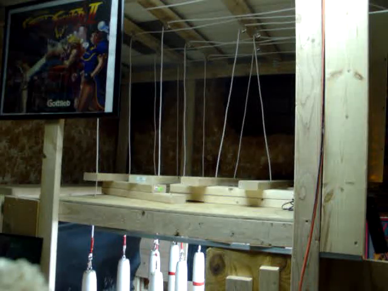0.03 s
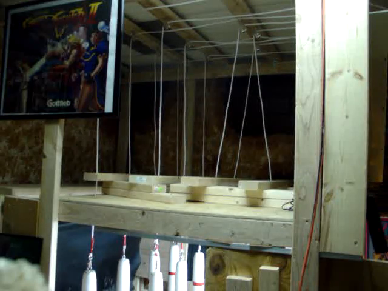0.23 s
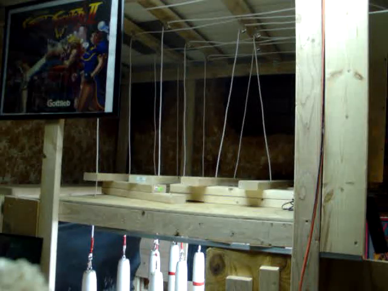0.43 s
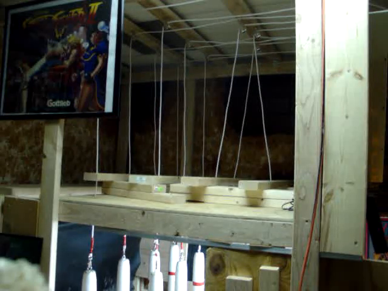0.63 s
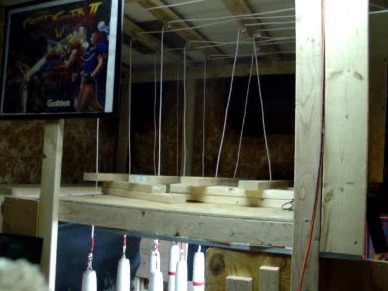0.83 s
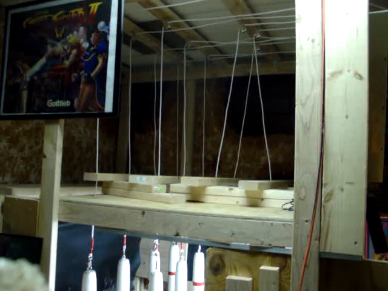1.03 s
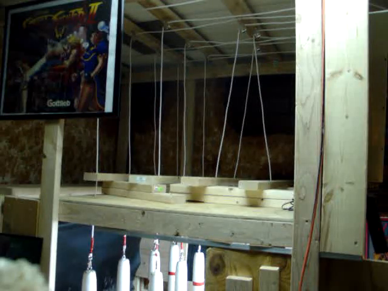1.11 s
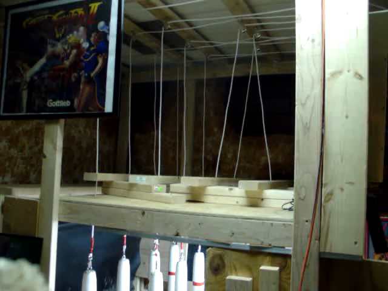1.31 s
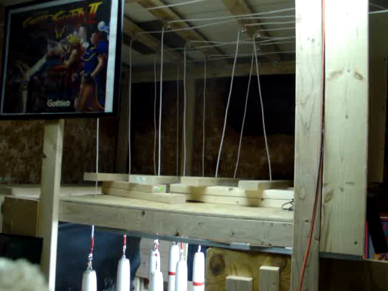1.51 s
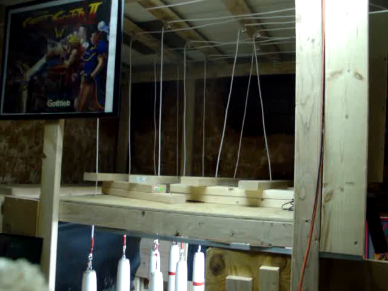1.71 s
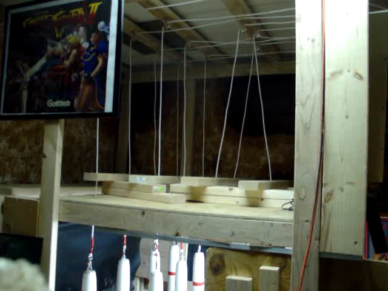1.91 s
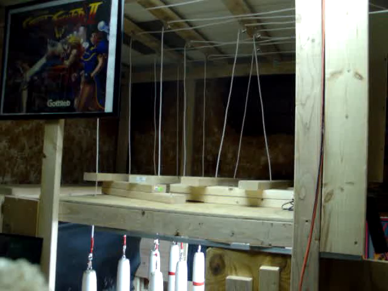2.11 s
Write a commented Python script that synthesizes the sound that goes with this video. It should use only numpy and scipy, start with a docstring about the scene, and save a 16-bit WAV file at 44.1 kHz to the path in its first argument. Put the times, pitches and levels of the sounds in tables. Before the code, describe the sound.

Hanging wooden pins knock and clatter irregularly against each other and a timber frame.

```python
"""Wooden pins on cords knock against each other and their timber frame in a small basement.
Each knock makes a pin ring and the room echo; two loud clatters stand among lighter taps.
The frame's boards give hollow thuds when bumped, and the frame rumbles softly over a faint hiss.
A cord rasps as it rubs over wood, then slips with one short squeak."""
import sys
import numpy as np
from scipy import signal
from scipy.fft import rfft, irfft, next_fast_len
from scipy.io import wavfile

SR = 44100
rng = np.random.default_rng(int(sys.argv[2]) if len(sys.argv) > 2 else 0)


def wrap_up_sound(samples):
    """Save the sound to the file named by the first command line argument, as 16-bit audio."""
    columns = np.atleast_2d(samples).T
    # keep every value between -1 and 1, then stretch to whole-number steps
    tamed = np.clip(columns, -1, 1)
    steps = np.round(tamed * 32767).astype(np.int16)
    wavfile.write(sys.argv[1], SR, steps)


N = 94815

# How loud the frame rumbles. Each row: time in seconds, level in dB.
RUMBLE_LEVELS = [(0, -37), (.13, -32), (.42, -34), (.62, -27.5), (0.771, -41.5), (.95, -31), (1.25, -29.5),
                 (1.45, -33.5), (1.749, -27.5), (1.951, -36.5), (2.15, -34)]
# The rumble's tone, from low to high. Each row: frequency in Hz, level in dB.
RUMBLE_TONE = [(20, -50), (40, -37), (58, -10), (85, -9), (130, -4.5), (170, -7), (220, 0), (420, -3),
               (600, -13.5), (1000, -19), (2000, -30), (5000, -45.5)]
# Pitches the frame favours. Each row: frequency in Hz, width in Hz, boost in dB.
FRAME_PEAKS = [(137.6, 27, 10), (208.5, 15, 8.8), (354, 8.2, 10.7), (414, 90, 3.1), (496, 23, 8.4),
               (587, 39, 3.1)]
# The hiss's tone. Each row: frequency in Hz, level in dB.
HISS_TONE = [(100, -2), (1500, -3), (3000, -10), (6000, -14.5), (9000, -15), (10000, -30.5)]
# Bumps on the boards. Each row: start in seconds, pitch in Hz, level in dB, fade time in seconds.
# A fade time is how long a sound takes to drop by 60 dB.
BOARD_THUDS = [(.064, 414, -26.5, 0.15), (.240, 146.5, -25.5, 0.3), (.250, 201.4, -20, 0.24),
               (.400, 199, -23.5, 0.2), (0.481, 361, -10.5, 0.033), (0.498, 357, -5.5, 0.032),
               (0.551, 229, -26.5, 0.11), (.626, 207, -19.5, .14), (.645, 60.5, -34.5, 0.43),
               (.803, 272, -13, 0.19), (0.807, 32.6, -33.5, 0.32), (.815, 339.1, -15.5, 0.29),
               (.848, 249, -9.5, 0.14), (1.170, 140.3, -33.5, 1), (1.172, 268, -23.5, 0.24),
               (1.180, 407, -22, 0.25), (1.372, 370.5, -20, 0.42), (1.575, 568, -17.5, 0.56),
               (1.590, 385, -17, 0.62), (1.600, 127.2, -22, 0.2), (1.620, 497.4, -22, 0.7),
               (1.660, 51, -35, 0.3), (1.695, 194, -14.5, 0.28), (1.740, 186, -20, 0.12)]
# How the cord's rasp swells. Each row: time in seconds, level in dB.
RASP_LEVELS = [(0.151, -71), (0.174, -42.5), (.2, -49.5), (0.223, -54.5), (0.254, -46), (.3, -57),
               (.35, -68)]
# Bright pitches in the rasp. Each row: frequency in Hz, width in Hz, level in dB.
RASP_PEAKS = [(2780, 350, -2), (3680, 300, 1.5), (7300, 2100, 0.81)]
# Knocks of the pins. Each row: start in seconds, four levels in dB that shape the wood's tone
# (bass, body, clack, snap), rise time in seconds, level of the pin's ringing in dB.
PIN_KNOCKS = [(0.155, -49, -46, -31.5, -68, 0.0035, -56), (.167, -44.5, -35, -52, -43, 0.0028, -44),
              (0.206, -38.5, -42.5, -38, -71.5, .002, -35), (.230, -30, -35, -39, -54.5, 0.0011, -33.5),
              (0.24, -28, -30, -37, -51, 0.002, -28.5), (0.355, -31.5, -37, -63, -72, 0.009, -49),
              (.482, -27, -31, -48.5, -40.5, 0.0027, -47), (.526, -20.5, -28, -39, -58, 0.004, -34.5),
              (.606, -32, -42.5, -42, -54, 0.0033, -38), (.799, -23, -25.5, -24.5, -33, 0.0045, -23.5),
              (.814, -20.5, -19.5, -30, -40.5, 0.0014, -16), (.848, -22.5, -38.5, -57, -36.5, 0.0025, -27),
              (1.000, -30, -46, -45, -70.5, 0.011, -46), (1.063, -32, -40, -55.5, -46.5, 0.0035, -38.5),
              (1.167, -30.5, -32.5, -34, -44.5, 0.0082, -32), (1.245, -29, -42, -50, -67, 0.0045, -46),
              (1.370, -35.5, -35.5, -41.5, -56.5, 0.0052, -43.5),
              (1.486, -30, -33.5, -41, -60.5, 0.0048, -44.5), (1.517, -26, -37, -44.5, -46.5, 0.0014, -55),
              (1.569, -26, -23, -20.5, -28.5, 0.0037, -20), (1.592, -20, -18, -52, -72, .003, -22.5),
              (1.619, -22, -18, -21.5, -29, 0.0031, -15), (1.675, -22.5, -23.5, -31, -40, 0.012, -28),
              (1.837, -27.5, -34.5, -42, -46.5, 0.0044, -40), (1.962, -40, -54, -55.5, -50, 0.0034, -56),
              (1.979, -34, -36.5, -43.5, -68.5, 0.0098, -43), (2.022, -24, -38.5, -50.5, -53, 0.0089, -37)]
# The centres of bass, body, clack and snap, in Hz.
KNOCK_BANDS_HZ = [250, 750, 2600, 7000]
# The woody tone that all knocks share. Each row: frequency in Hz, level in dB.
WOOD_TONE = [(20, -37), (45, -37.5), (90, -24), (130, -9.5), (240, -1.5), (400, -1), (750, -5),
             (1500, -10.5), (2600, -12), (4500, -13.5), (8000, -20), (10000, -29.5)]
# Notes a pin rings with. Each row: pitch in Hz, dB added to the ringing level, fade time in seconds.
PIN_NOTES = [(853, -8, 0.33), (1013, -14.5, 0.12), (1127, -10, 0.21), (1185, -17.5, 0.2), (1482, -14, 0.25),
             (1643, -11.5, 0.23), (1903, -15.5, 0.25), (2085, -20, 0.36), (2500, -18.5, 0.34),
             (3180, -35.5, 0.66)]
# How long the basement echoes. Each row: frequency in Hz, fade time in seconds.
ROOM_FADES = [(60, 0.4), (200, 0.61), (500, 0.43), (1200, 0.37), (3000, .34), (6000, 0.34), (10000, 0.28)]


def gain(db):
    """Turn decibels into a number to multiply a sound by."""
    return 10 ** (np.asarray(db) / 20)


def normalise(sound):
    """Scale a sound to an average (rms) strength of 1."""
    return sound / np.sqrt(np.mean(sound ** 2) + 1e-20)


def look_up(points, hz):
    """Read between the rows of a (frequency, value) table, on a log frequency scale."""
    freqs, values = np.transpose(points)
    return np.interp(np.log(hz + 1), np.log(freqs + 1), values)


def peak(hz, centre, width):
    """A resonance: a hump that is 1 at its centre and falls away on both sides."""
    return 1 / (1 + (2 * (hz - centre) / width) ** 2)


def filtered(sound, response):
    """Multiply each frequency in a sound by response(hz)."""
    size = next_fast_len(len(sound) + 8192)
    return irfft(rfft(sound, size) * response(np.fft.rfftfreq(size, 1 / SR)), size)[:len(sound)]


def room_fade(sound, late_db=-20, late_fade_s=0.4):
    """Let each frequency die away as it does in the room, with a quieter tail shared by all."""
    hz, t, spectrum = signal.stft(sound, SR, nperseg=256)
    early = gain(-60 * t / look_up(ROOM_FADES, hz)[:, None])
    late = gain(late_db - 60 * t / late_fade_s)
    return signal.istft(spectrum * np.hypot(early, late), SR)[1][:len(sound)]


def ring(t, hz, fade_s):
    """One pure, fading note of struck wood."""
    return np.sin(2 * np.pi * hz * t) * gain(-60 * t / fade_s)


def frame_rumble():
    """The frame rumbles with a low noise, stronger at the pitches it favours."""
    boost_db = lambda hz: sum(db * peak(hz, centre, width) for centre, width, db in FRAME_PEAKS)
    noise = filtered(rng.standard_normal(N), lambda hz: gain(look_up(RUMBLE_TONE, hz) + boost_db(hz)))
    level_db = np.interp(np.arange(N) / SR, *np.transpose(RUMBLE_LEVELS))
    return gain(level_db) * normalise(noise)


def room_hiss(level_db=-57.5):
    """The room has a faint, steady hiss."""
    noise = filtered(rng.standard_normal(N), lambda hz: gain(look_up(HISS_TONE, hz)))
    return gain(level_db) * normalise(noise)


def board_thuds(rise_s=0.0007):
    """A bumped board booms at its own pitch."""
    out, t = np.zeros(N), np.arange(SR) / SR
    for start, hz, db, fade_s in BOARD_THUDS:
        add(out, start, gain(db) * ring(t, hz, fade_s) * (1 - np.exp(-t / rise_s)))
    return out


def cord_rasp(slips_per_s=1900):
    """A cord rubs over wood in tiny random slips that set a few bright pitches ringing."""
    slips = rng.standard_normal(N) * (rng.random(N) < slips_per_s / SR)
    tone = lambda hz: sum(gain(db) * peak(hz, centre, width) for centre, width, db in RASP_PEAKS)
    times, levels_db = np.transpose(RASP_LEVELS)
    swell = np.interp(np.arange(N) / SR, times, gain(levels_db), left=0, right=0)
    return swell * normalise(filtered(slips, tone))


def pin_knocks(crack_db=11.5, crack_fade_s=0.031, hard_rise_s=0.005, scatter_db=2.5, detune=0.003):
    """A knock starts with a crack, rings the pin and leaves a wash of noise from timber and walls."""
    out, t = np.zeros(N), np.arange(SR) / SR
    wood_rms = np.sqrt(np.mean(gain(look_up(WOOD_TONE, np.arange(SR // 2))) ** 2))
    for start, *bands_db, rise_s, ring_db in PIN_KNOCKS:
        bands = list(zip(KNOCK_BANDS_HZ, bands_db))
        tone = lambda hz: gain(look_up(WOOD_TONE, hz) + look_up(bands, hz))
        wash = room_fade(2 * filtered(rng.standard_normal(SR), tone) / wood_rms)
        ringing = np.zeros(SR)
        for hz, db, fade_s in PIN_NOTES:  # no two knocks ring quite alike
            strength = rng.choice([-1, 1]) * gain(ring_db + db + rng.normal(0, scatter_db))
            ringing += strength * ring(t, hz * rng.normal(1, detune), fade_s)
        # The crack is a brief boost at the start; soft bumps rise slowly and get less of it.
        crack = 1 + gain(crack_db - 60 * t / crack_fade_s) / (1 + (rise_s / hard_rise_s) ** 2)
        rise = 1 - np.exp(-t / rise_s)
        add(out, start, rise * crack * (wash + ringing))
    return out


def cord_squeak(start_s=0.5205, length_s=0.013, from_hz=2200, to_hz=1680, level_db=-29, echo_db=-6):
    """A cord slips with a short falling squeak that hangs in the room."""
    out, progress = np.zeros(N), np.linspace(0, 1, int(length_s * SR))
    hz = to_hz + (from_hz - to_hz) * (1 - progress) ** 2
    swell = np.sin(np.pi * np.sqrt(progress))
    squeak = gain(level_db) * swell * np.sin(2 * np.pi * np.cumsum(hz) / SR)
    room = room_fade(rng.standard_normal(SR // 2))
    echo = signal.fftconvolve(squeak, room / np.linalg.norm(room))
    add(out, start_s, squeak)
    add(out, start_s, gain(echo_db) * echo)
    return out


def add(track, start_s, sound):
    """Mix a sound into the track at its start time."""
    part = track[round(start_s * SR):][:len(sound)]
    part += sound[:len(part)]


def scene():
    """All the sounds together at one microphone."""
    return (frame_rumble() + room_hiss() + board_thuds() + cord_rasp() + pin_knocks() + cord_squeak())[None]


def record(dry):
    """The recorder rounds off the loudest peaks and cuts the highest treble."""
    ceiling, top_hz = 0.69, 10050
    rounded = dry / (1 + np.abs(dry / ceiling) ** 10) ** (1 / 10)
    return np.array([filtered(channel, lambda hz: hz < top_hz) for channel in rounded])


dry = scene()
out = record(dry)
wrap_up_sound(out)
```